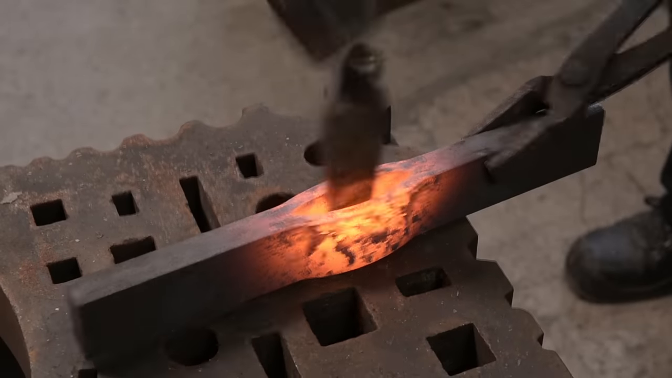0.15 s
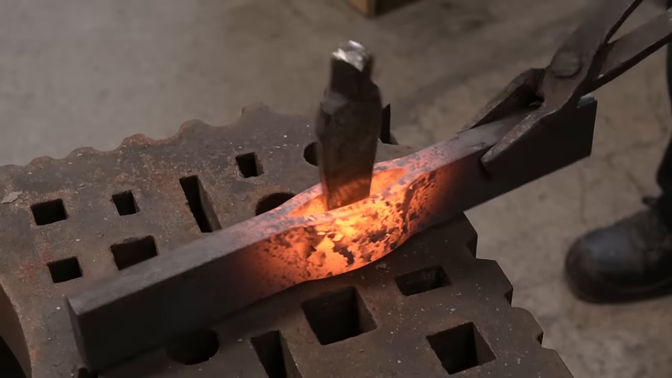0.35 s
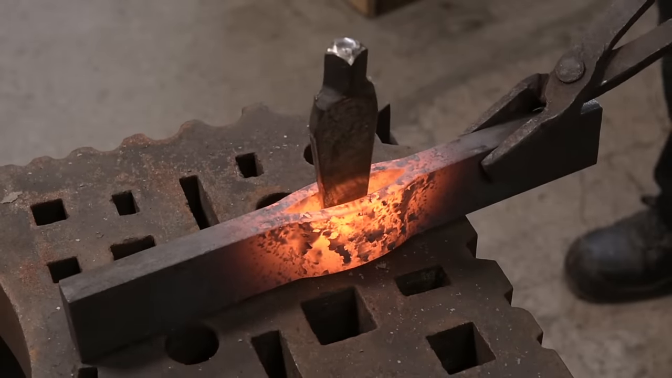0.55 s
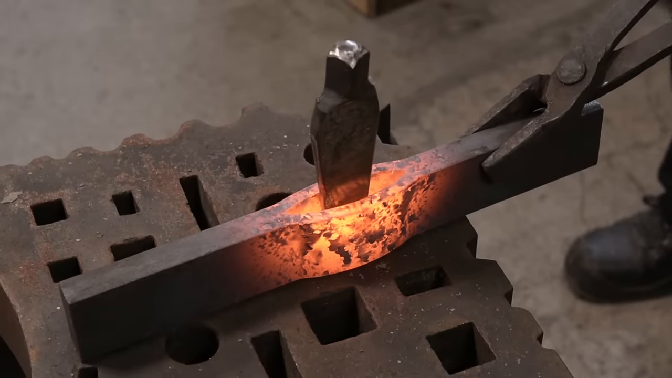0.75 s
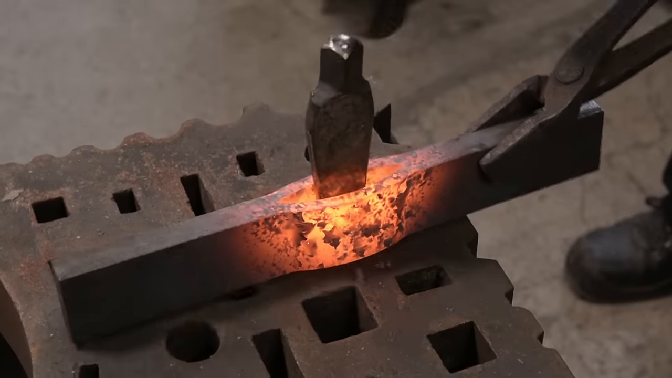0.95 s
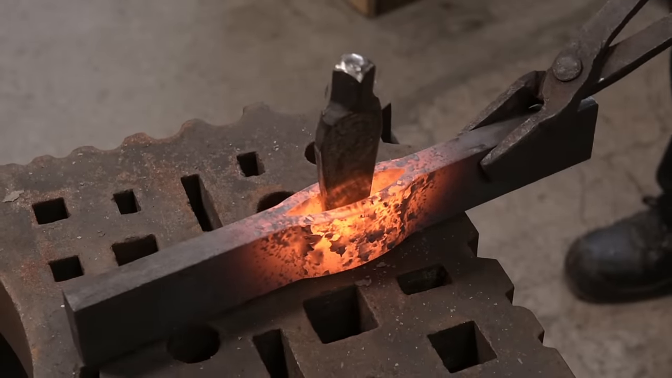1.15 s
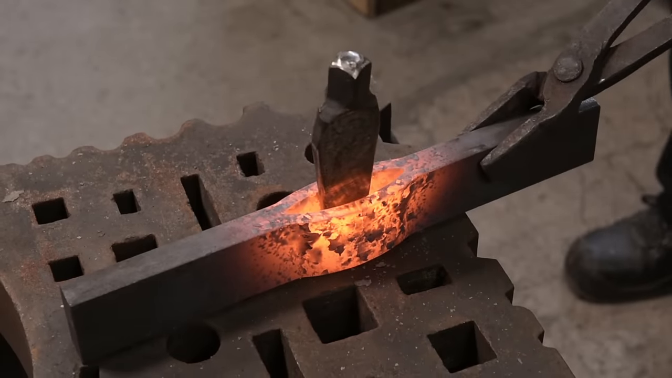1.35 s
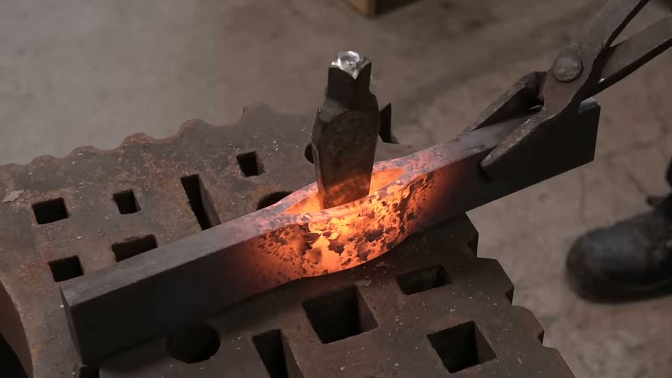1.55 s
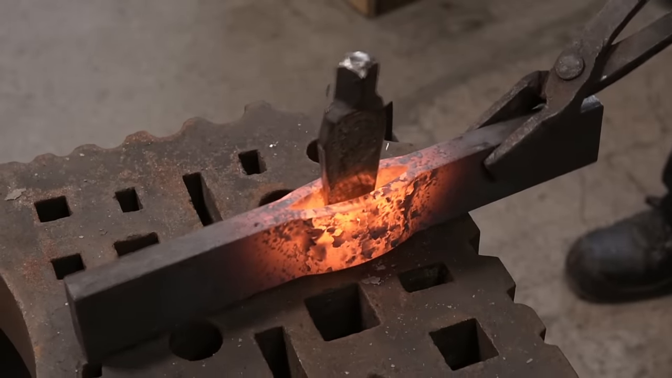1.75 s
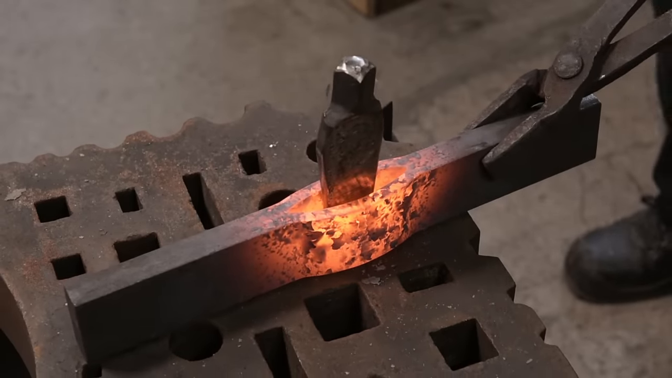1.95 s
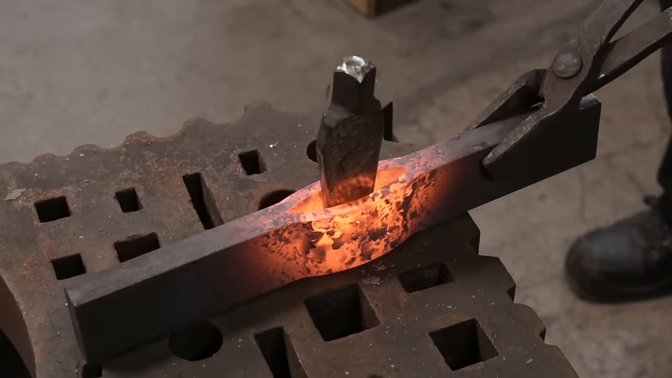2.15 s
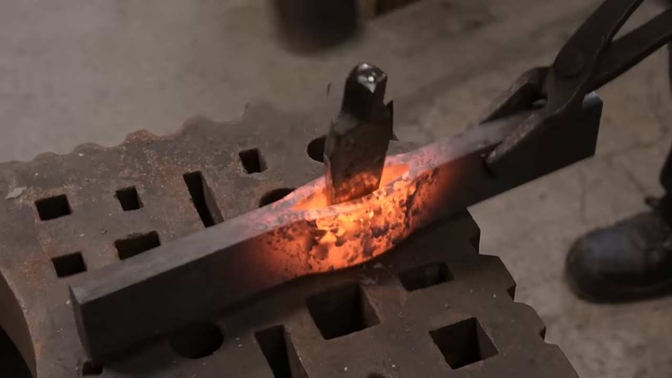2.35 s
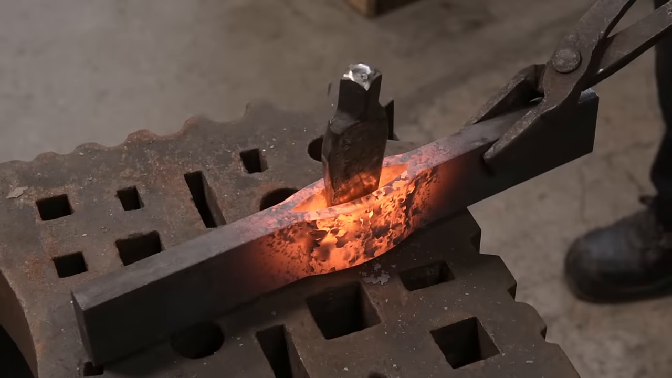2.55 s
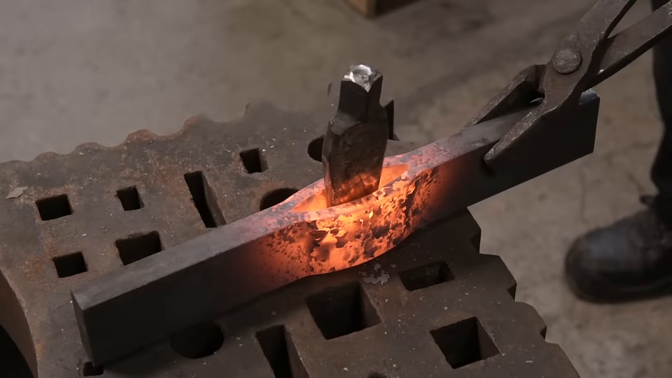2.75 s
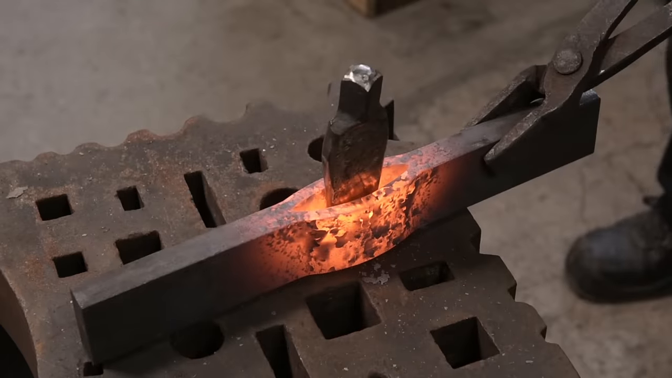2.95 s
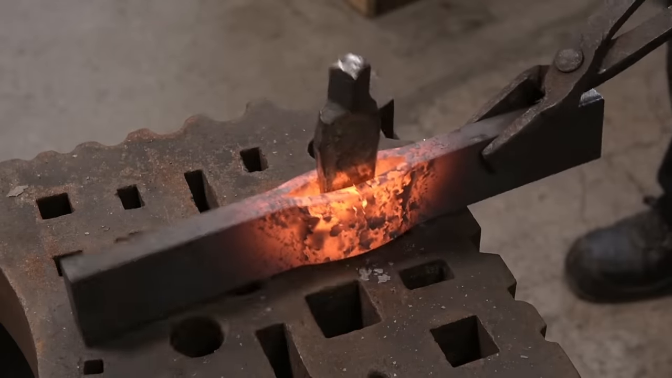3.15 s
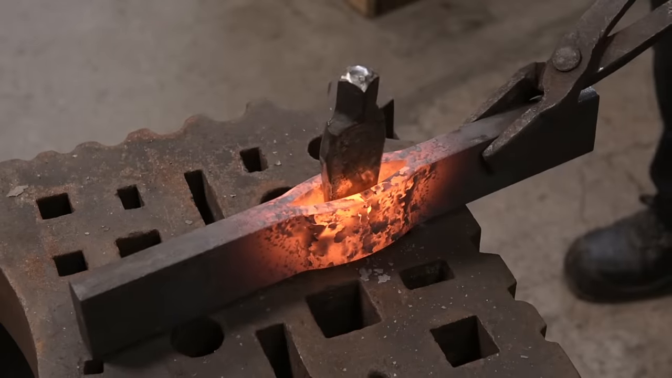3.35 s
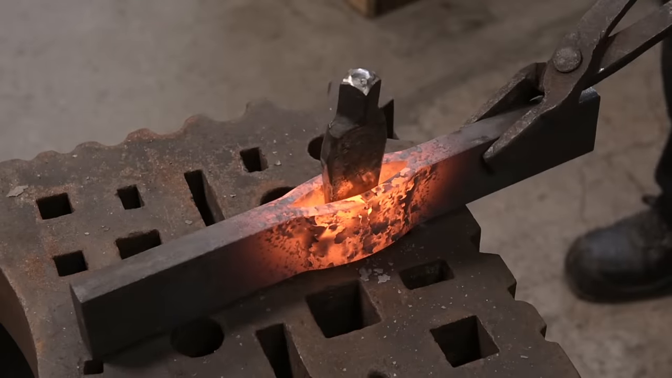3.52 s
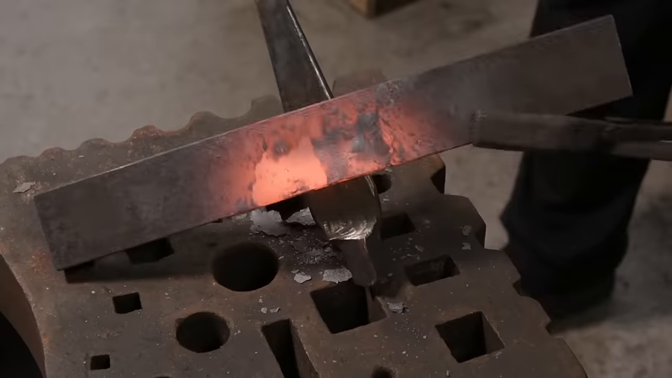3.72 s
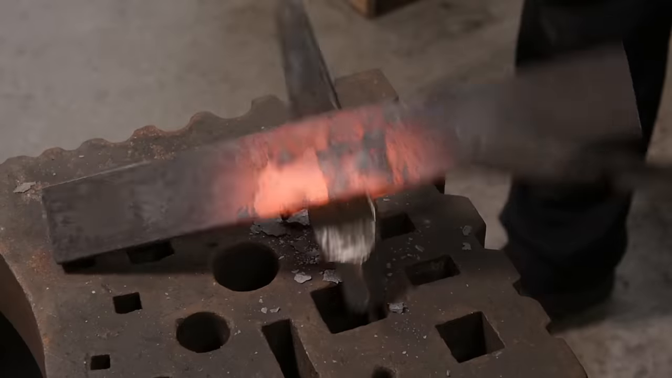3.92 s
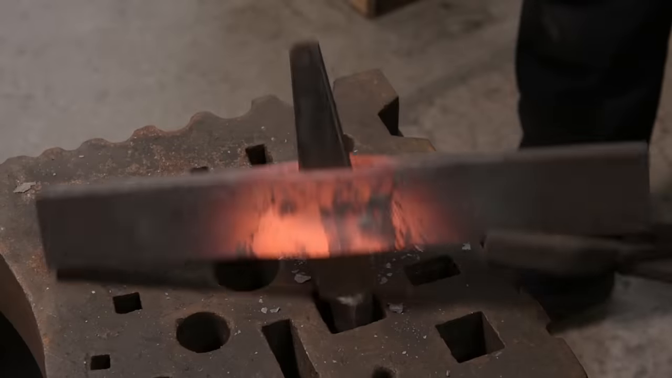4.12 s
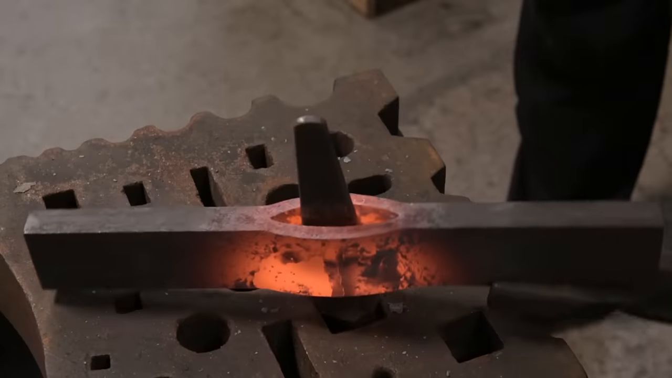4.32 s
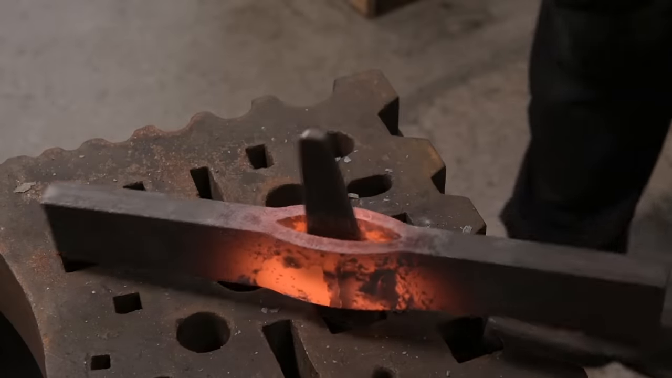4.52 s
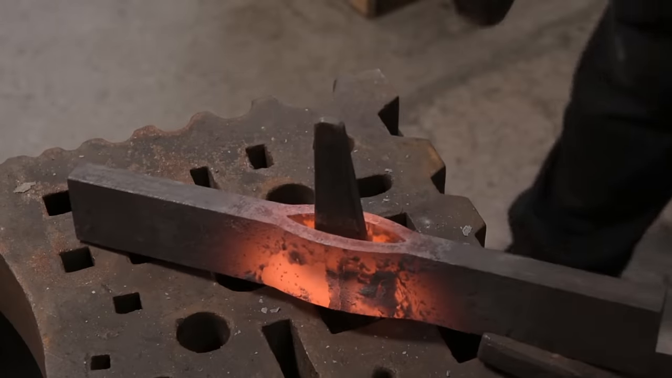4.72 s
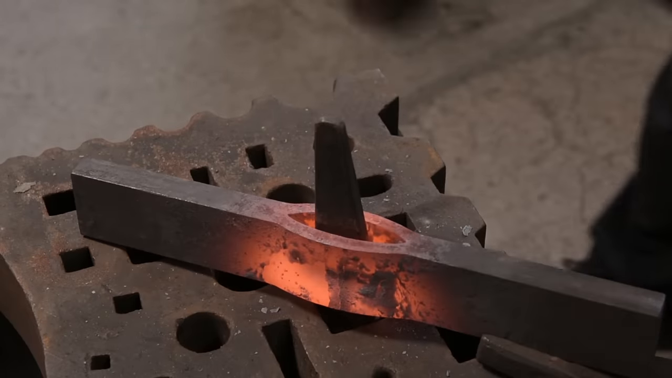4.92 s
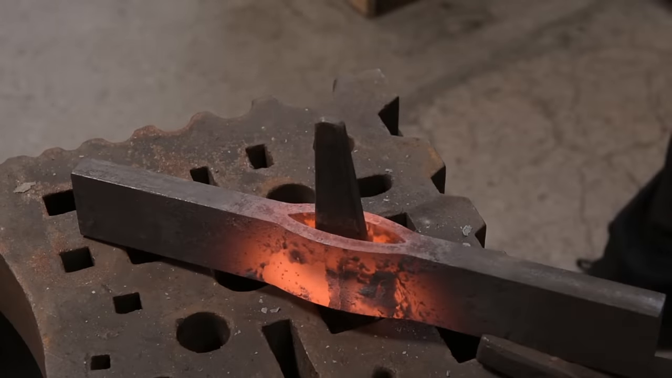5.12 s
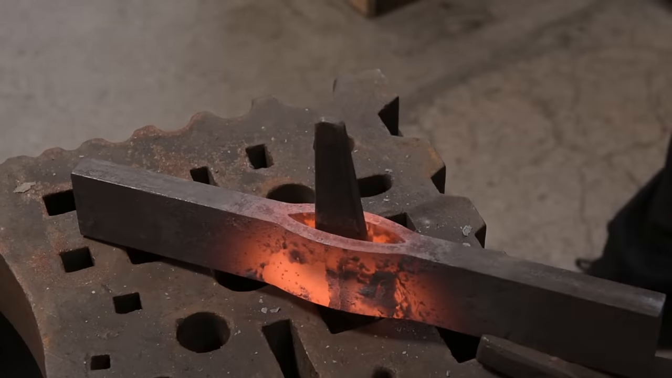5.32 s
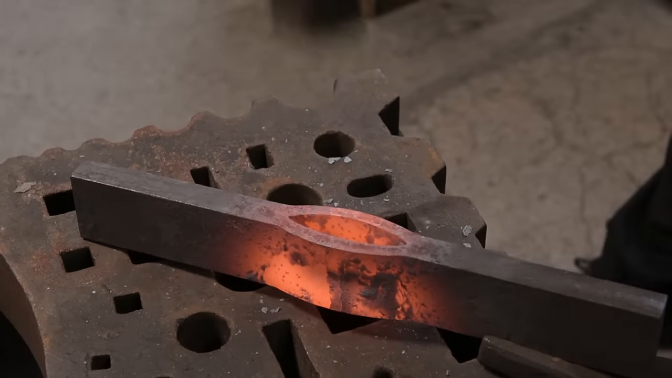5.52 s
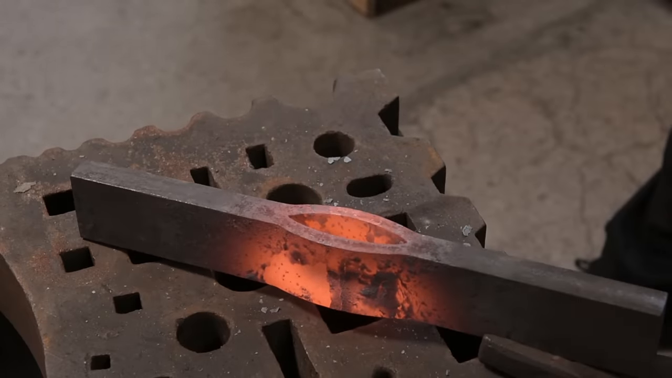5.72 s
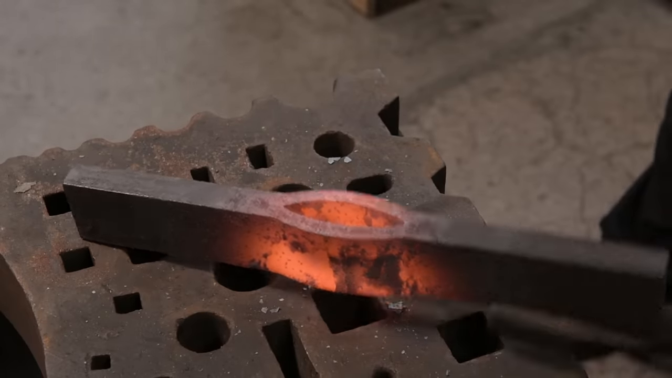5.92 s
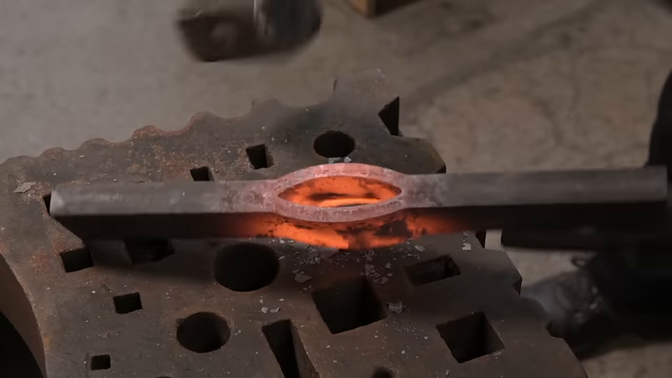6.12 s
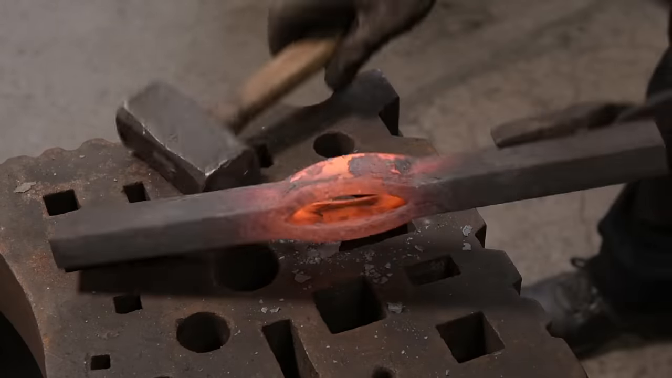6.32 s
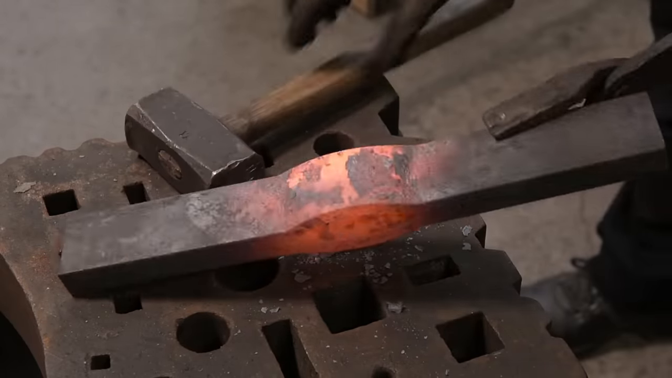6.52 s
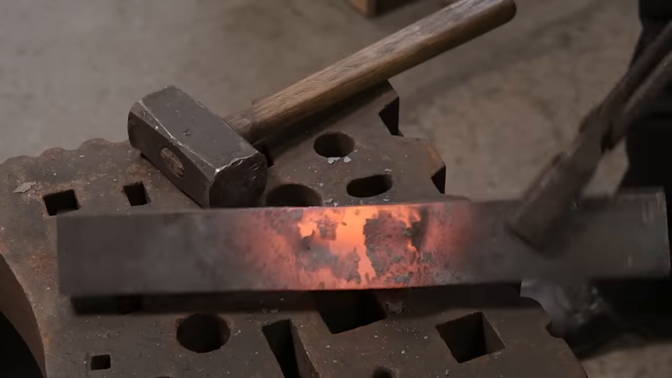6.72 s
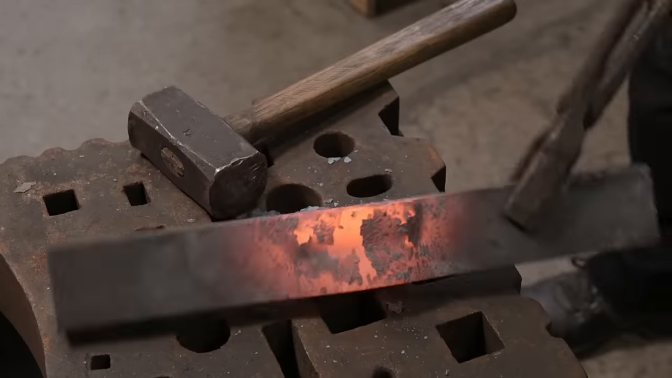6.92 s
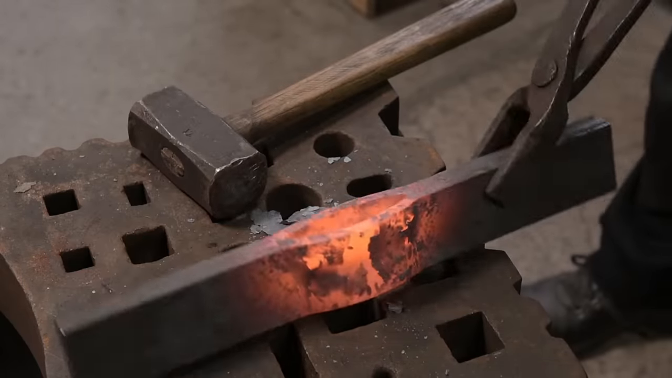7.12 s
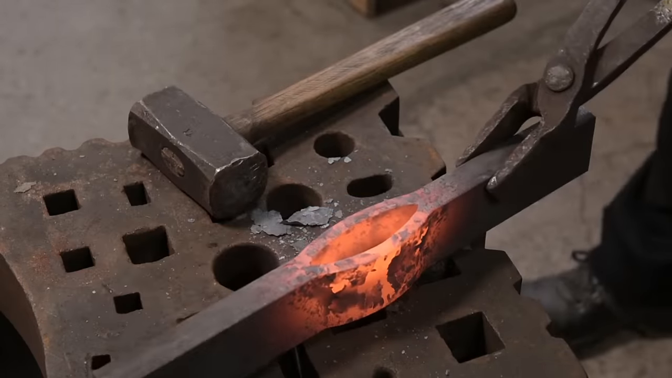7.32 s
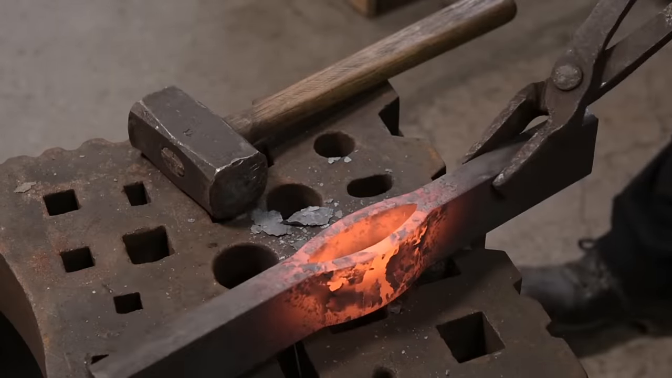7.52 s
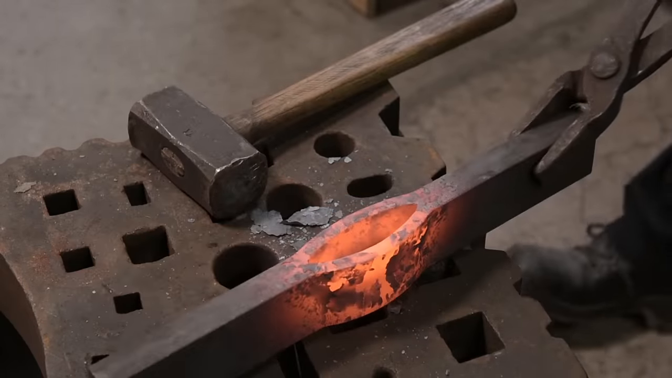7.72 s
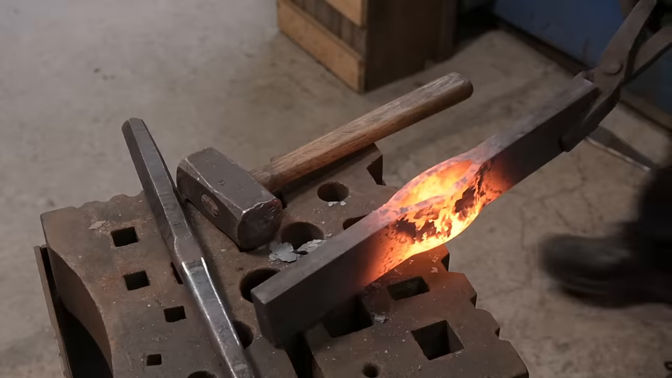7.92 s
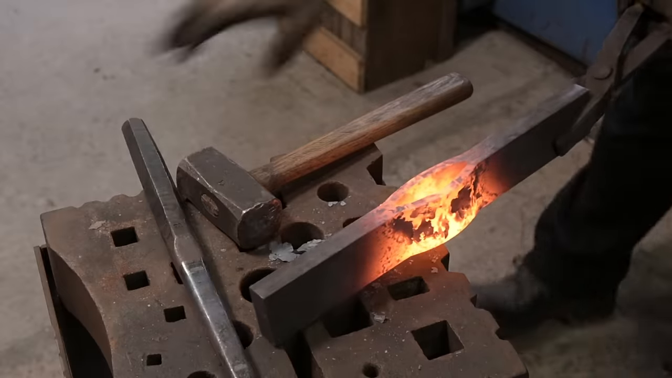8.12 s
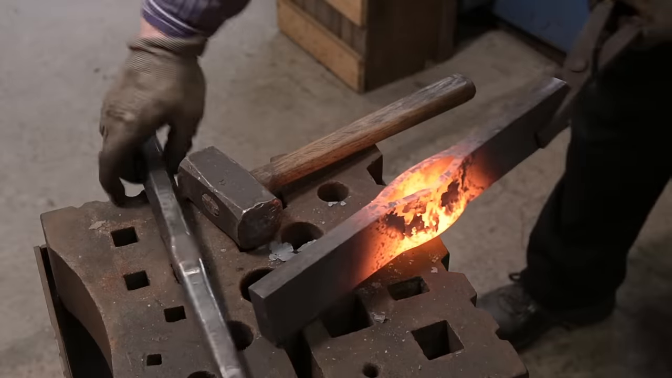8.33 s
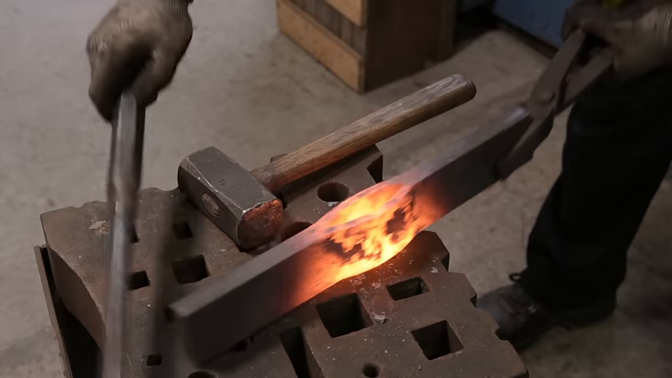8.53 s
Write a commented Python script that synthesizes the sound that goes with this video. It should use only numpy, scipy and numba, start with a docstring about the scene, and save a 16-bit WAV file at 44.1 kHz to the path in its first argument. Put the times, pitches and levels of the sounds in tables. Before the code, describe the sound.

In a workshop, a sledge strikes a steel drift in five loud, slightly distorted blows, about 0.7 seconds apart, each with a sharp crack, short iron ring, low thud and clatter. The bar turns with small knocks and scrapes. One lighter blow knocks the drift out; it clangs and bounces near the microphone with a piercing, wavering ring. The sledge clunks down and a longer steel bar rings briefly.

```python
"""Driving a drift through a hot bar

In a workshop a sledge drives a steel drift through a hot bar lying on an iron swage block: noise cracks,
ringing modes and the stand's thud. The bar is turned over; the drift is knocked out, rings in fluttering
lines, strikes the stand and bounces on the floor near the microphone. Tools knock and scrape on the block,
over a quiet room tone. The recorder overloads on the blows; its limiter then pulls the level down and
holds the tails up."""
import sys
import numpy as np
from scipy import signal
from scipy.fft import rfft, irfft
from scipy.io import wavfile
from scipy.ndimage import uniform_filter1d
from numba import njit

SR = 44100
rng = np.random.default_rng(int(sys.argv[2]) if len(sys.argv) > 2 else 0)


def amp(db):
    return 10 ** (np.asarray(db, float) / 20)


def write(x):
    x = np.atleast_2d(x).T
    wavfile.write(sys.argv[1], SR, np.round(np.clip(x, -1, 1) * 32767).astype(np.int16))


N = 382347   # samples

# ringing modes of the swage block: pitch_hz, level_db, t60_s
BLOCK_MODES = [(1104, -17, .18), (1314, -12, .2), (1486, -11, .18), (1583, -9, .2), (1640, -8, .18),
               (1690, -4, .2), (1750, -5, .2), (1795, -3, .26), (1830, -5, .22), (1868, -3, .22),
               (1920, -4, .2), (1981, -3, .24), (2024, -5, .2), (2075, -7, .18), (2213, -11, .18),
               (2546, -16, .2), (2606, -16, .2), (2810, -13, .2), (3480, -17, .16), (3714, -15, .18),
               (3946, -12, .2), (4040, -13, .18), (4221, -15, .16)]
# low modes of the stand under it: pitch_hz, level_db, t60_s
STAND_MODES = [(55, -4.5, 0.57), (59.6, 2.8, 0.9), (65, -9, 1)]


def rms_one(x):
    """Scales a sound to rms 1."""
    return x / np.sqrt(np.mean(x ** 2) + 1e-20)


def at_hz(points, hz):
    """Reads a table of (Hz, value) on a log-frequency axis."""
    table_hz, values = np.array(points).T
    return np.interp(np.log(hz), np.log(table_hz), values)


def coloured(spectrum):
    """Steady noise of rms 1; the table gives only the shape of its spectrum."""
    hz = np.maximum(np.fft.rfftfreq(N, 1 / SR), 1)
    shaped = rfft(rng.standard_normal(N)) * amp(at_hz(spectrum, hz))
    return rms_one(irfft(shaped, N))


def clicks(times, db):
    """One-sample pulses at the given times."""
    out = np.full(N, 1e-18)   # tiny floor in place of silence
    out[np.round(np.asarray(times) * SR).astype(int)] += amp(np.asarray(db))
    return out


def dying(pulses, t60):
    """Each click becomes a step that fades by 60 dB in t60 seconds."""
    return signal.lfilter([1], [1, -amp(-60 / (t60 * SR))], pulses)


def band(x, low_hz, high_hz):
    """Butterworth band-pass."""
    edges = [low_hz, min(high_hz, .45 * SR)]
    return signal.sosfilt(signal.butter(2, edges, "band", fs=SR, output="sos"), x)


def struck(modes, times, db, spread_db, contact_t60=0):
    """Every hit shakes every mode by its own chance strength, with a clean click or a short rough contact."""
    out = np.zeros(N)
    chance = rng.standard_normal((len(times), len(modes)))
    rough = rng.standard_normal(N)
    for (hz, mode_db, t60), luck in zip(modes, chance.T):
        push = clicks(times, db + mode_db + spread_db * luck)
        if contact_t60:
            # scaled to the energy of the clean click
            push = rough * dying(push, contact_t60) * np.sqrt(2 * np.log(1000) / (contact_t60 * SR))
        r, w = amp(-60 / (t60 * SR)), 2 * np.pi * hz / SR
        out += signal.lfilter([0, np.sin(w)], [1, -2 * r * np.cos(w), r * r], push)
    return out


def sledge_blows():
    """A blow cracks, rings the block through a rough contact, thuds the stand and sets off a clatter."""
    # blows: start_s, crack_db, block_ring_db, stand_thud_db,
    # bright_db (added to the crack's treble; per octave in the clatter)
    blows = [(0.2309, 13, -9.5, -19, 4.5), (.987, 13, -8.5, -20.5, 3.5), (1.703, 14, -6.5, -19, 2.2),
             (2.395, 11, -12, -25, 1.27), (3.087, 15.5, -8, -22, 0.95), (5.4535, 5.5, -18.5, -25.5, 3)]
    # spectrum of the crack: pitch_hz, relative level_db per Hz
    crack_spectrum = [(59, -37), (100, -7), (206, -3), (502, -18.5), (1170, -6.5), (1760, 2.5), (2320, -5),
                      (3320, -1), (4700, -16.5), (5700, -15.5), (7450, -32), (11600, -46), (16000, -45)]
    # high modes of the sledge: pitch_hz, level_db, t60_s
    sledge_modes = [(11320, -55, .3), (11350, -53, .3)]
    # the block rocking on its stand: pitch_hz, level_db, t60_s
    rocking_modes = [(164, -2.5, 0.47), (204.2, -0.4, 0.61), (216, -5.5, 0.21), (255, -0.5, 0.13)]
    s, crack_db, ring_db, thud_db, bright_db = np.transpose(blows)
    crack = coloured(crack_spectrum)
    treble = band(crack, 4200, 8400)   # about an octave above the middle of the crack
    iron = (crack - treble) * dying(clicks(s, crack_db), 0.042)
    iron += treble * dying(clicks(s, crack_db + bright_db), 0.037)
    iron += struck(BLOCK_MODES, s, ring_db, 0.59, contact_t60=0.035)
    iron += struck(sledge_modes, s, crack_db, 4)
    stand = struck(STAND_MODES, s, thud_db, 0.66)
    stand += struck(rocking_modes, s, ring_db - 10, 0.7)   # it rocks as hard as it rings
    clatter_db = -14 + 0.1 * crack_db   # the clatter follows a tenth of the crack's dB
    return iron, stand + clatter(s, clatter_db, bright_db)


def clatter(times, db, bright_db):
    """The countless close modes of bar, block and loose tools: a dense wash that dies band by band."""
    # loudness of the wash: pitch_hz, level_db per half-octave band
    band_levels = [(300, -17), (700, -10), (1200, -3.5), (1800, 1), (2500, 4), (3500, -1), (5000, 0.5),
                   (6500, -1.5), (8500, -9), (11000, -12), (15000, -29)]
    # its decay: pitch_hz, t60_s
    band_decays = [(300, 1), (1800, 0.55), (3500, 0.31), (6000, 0.26), (9000, 0.055), (14000, .3)]
    rattles_per_s, rattle_db, rattle_t60_s = 600, -5.5, 0.0042   # loose iron chatters inside it
    rattle = (rng.random(N) < rattles_per_s / SR) * rng.exponential(1, N)
    chatter = 1 + amp(rattle_db) * dying(rattle + 1e-18, rattle_t60_s)
    white = rng.standard_normal((2, N)) * chatter   # neighbouring bands take different noise
    edges = 220 * 2 ** np.arange(0, 6.3, .5)
    out = np.zeros(N)
    for k, (low, high) in enumerate(zip(edges, edges[1:])):
        hz = np.sqrt(low * high)
        hits = clicks(times, db + at_hz(band_levels, hz) + bright_db * np.log2(hz / 2500))
        out += rms_one(band(white[k % 2], low, high)) * dying(hits, at_hz(band_decays, hz))
    return out


def free_bar(modes, hits, crack_t60, flutter_db, flutter_hz, lying_share, share_per_s):
    """A free bar's lines flutter as it turns, ring longer the higher it jumps; each touch chokes the old ring."""
    # a bar landing: pitch_hz, relative level_db per Hz
    landing_spectrum = [(59, -40), (100, -12.5), (2130, -10.5), (2470, -20), (3320, -2.5), (3860, -23),
                        (10700, -57.5), (14100, -42), (16000, -52)]
    s, crack_db, *_ = np.transpose(hits)
    out = coloured(landing_spectrum) * dying(clicks(s, crack_db), crack_t60)
    chance = rng.uniform(0, 2 * np.pi, (len(hits), len(modes), 3))
    # share of the free t60 left: grows with the time to the next touch
    shares = lying_share + share_per_s * np.diff(s, append=s[-1])
    ends = [*s[1:], s[-1] + 1]
    for begin, end, share, hit, turns in zip(s, ends, shares, hits, chance):
        _, _, ring_db, tilt_db, edge_db = hit
        start = round(begin * SR)
        t = np.arange(min(N, round((end + .02) * SR)) - start) / SR
        choke = amp(-3000 * np.maximum(t - end + begin, 0))   # 3000 dB per s from the next touch on
        held = np.clip(t / .0015, 0, 1) * choke
        for (hz, db, t60, edgewise), (phase, turn, speed) in zip(modes, turns):
            struck_db = ring_db + db + edge_db * edgewise + tilt_db * np.log2(hz / 4000)
            # each line at 0.48 to 1.48 times flutter_hz
            facing_db = flutter_db * np.sin(turn + (3 + speed) * flutter_hz * t)
            fade_db = -60 * t / (t60 * max(share, .05))
            level = held * amp(struck_db + facing_db + fade_db)
            out[start:start + len(t)] += level * np.sin(2 * np.pi * hz * t + phase)
    return out


def falling_drift():
    """The drift rings in bending modes at each touch, and lengthwise from the end-on blow."""
    # touches on steel or floor: start_s, crack_db, ring_db, brightness_db per octave, edgewise_modes_db
    bounces = [(5.4525, -20, -21, 11, -21), (5.700, 7, -19, -1, 5.5), (6.057, 0.5, -20, -3, -5),
               (6.286, -8.5, -28, -6, 12), (6.309, -5.5, -18.5, -3.5, 10), (6.407, -37, -12.5, 0, 0.5),
               (6.592, -27.5, -47, 3, 9)]
    # lengthwise ring from the end-on blow, mostly choked by later touches: start_s, level_db
    end_on = [(5.4545, -6.5), (5.699, -33.5), (6.057, -52), (6.407, -42)]
    # bending: pitch_hz, level_db, t60_s before the jump's share, edgewise (1 if the bar bends edgewise)
    bending_modes = [(1276, -6, 2.5, 0), (4404, -9, 1.2, 1), (5346, -7, 1.2, 1), (6200, -8, 1.5, 0),
                     (6238, -8, 1.2, 0), (9625, -12, 1.1, 1), (9927, -12, .6, 0), (9966, -12, .8, 0)]
    # lengthwise modes, same columns
    lengthwise_modes = [(13950, -.1, .8, 0), (13985, -4, .8, 0), (14400, -7, .6, 0), (15010, -20, .6, 0)]
    drift = free_bar(bending_modes, bounces, 0.036, flutter_db=6.0, flutter_hz=5.2,
                     lying_share=0.21, share_per_s=1.6)
    end_on_hits = [(s, -np.inf, db, 0, 0) for s, db in end_on]   # no crack of their own
    drift += free_bar(lengthwise_modes, end_on_hits, .01, flutter_db=4.5, flutter_hz=20.0,
                      lying_share=0.3, share_per_s=0.83)
    return drift


def tumbling_mode():
    """The drift's strongest mode swings toward the listener and away while it fades, beside two neighbours."""
    # stages, each begun by a touch or a half turn: start_s,
    # facing_db (before the fade), away_db (lost when turned away)
    stages = [(5.455, -9, 6.5), (5.702, 5, 9), (5.848, -2.5, 16), (6.056, 8, 16.5), (6.21, 0, -1.6),
              (6.417, -18, 4.5), (6.6, -59, .3)]
    # close neighbours rung by the blow: pitch_hz, level_db, t60_s
    neighbours = [(3350, -15, 0.89), (3200, -21.5, 0.42)]
    pitch_hz, octave_db = 3310, -32.5   # with a faint line at twice the pitch
    turn_s, fade_db_per_s, blend_s = 0.22, 31.5, 0.004
    edge_on_s, edge_on_width_s = 6.21, 0.012   # the mode vanishes as the drift passes edge-on
    s, facing_db, away_db = np.transpose(stages)
    t = np.arange(N) / SR
    stage = np.maximum(np.searchsorted(s, t) - 1, 0)
    since = t - s[stage]
    turned_away = np.cos(np.pi * since / turn_s) ** 2
    db = facing_db[stage] - away_db[stage] * turned_away - fade_db_per_s * since
    height = uniform_filter1d(amp(db), size=round(blend_s * SR)) * (t > s[0])
    height *= np.tanh((t - edge_on_s) / edge_on_width_s)
    phase = 2 * np.pi * pitch_hz * t
    line = height * (np.sin(phase) + amp(octave_db) * np.sin(2 * phase))
    return line + struck(neighbours, [s[0]], 0, 0)


def long_drift():
    """A longer drift, picked up and knocked, rings as a free bar; the block answers with a clatter."""
    # knocks: start_s, crack_db, ring_db, brightness_db per octave, edgewise_modes_db
    long_knocks = [(8.4035, -20, -13.5, -2.2, -6), (8.484, -30, -31.5, -4.5, 11.5),
                   (8.55, -22, -33.5, -6, 8.5)]
    # bar modes: pitch_hz, level_db, t60_s before the jump's share, edgewise (1 if the bar bends edgewise)
    long_modes = [(1174, -18, .4, 1), (1540, -14, .4, 1), (2105, -7, .4, 1), (2772, -11, .35, 1),
                  (3289, -.1, .3, 0), (3430, -8, .35, 1), (4414, -11, .35, 0), (4549, -11, .25, 0),
                  (4845, -8, .25, 0), (6519, -4, .3, 0), (8441, -9, .3, 0), (9921, -19, .4, 0),
                  (10670, -18, .3, 0), (12860, -25, .4, 0), (13440, -31, .5, 0), (15340, -17, .35, 0)]
    ring = free_bar(long_modes, long_knocks, 0.01, flutter_db=8.0, flutter_hz=22.2,
                    lying_share=0.17, share_per_s=3.6)
    s, _, ring_db, *_ = np.transpose(long_knocks)
    return ring, clatter(s, ring_db - 20.5, 2.5)   # 2.5 dB brighter per octave


def knocks_and_ticks():
    """Knocks have a clank, a bright edge, a low knock, a block ring and a push on the stand; ticks are bright."""
    # bar, tongs and hammer knock on the block, and at 5.847 s the falling drift strikes the stand:
    # start_s, clank_db, low_knock_db, block_ring_db
    knocks = [(0.419, -4.5, -10, -21), (0.454, -10, -22, -17), (0.601, -30, -24.5, -65),
              (3.716, -33, -16.5, -45), (3.947, -34.5, -27, -52.5), (4.047, -21, -9, -34),
              (4.122, -26, -20, -63), (4.168, -24, -17.5, -35), (4.26, -25, -13, -61),
              (4.695, -20, -15.5, -38), (4.721, -46.5, -18, -37.5), (5.847, 6, -10.5, -18.5),
              (6.37, -13.5, -17.5, -34), (6.418, 11, -10.5, -17), (6.481, 5, -12.5, -27.5),
              (6.511, 1.5, -14.5, -38), (6.594, 3, -14.5, -51), (6.698, -19, -23, -31),
              (6.761, -30, -25, -58), (6.822, -20.5, -6.5, -30.5), (6.989, -10.5, -30, -38.5),
              (7.361, -50, -22, -60), (7.764, -25.5, -29.5, -60.5), (7.895, -15, -20, -28),
              (8.272, -40, -44, -67), (8.547, -11.5, -24, -36), (8.624, -37, -28, -51)]
    # small bright ticks; those at 4.696 and 6.37 s are the bright edge of a knock: start_s, level_db
    ticks = [(2.217, -50), (4.696, -43), (4.808, -42.5), (6.37, -25.5), (7.208, -49), (7.533, -52),
             (8.343, -46), (8.353, -52), (8.362, -56)]
    s, clank_db, low_db, ring_db = np.transpose(knocks)
    white = rng.standard_normal((3, N))
    sparks = clicks(s, clank_db - 37) + clicks(*np.transpose(ticks))
    iron = band(band(white[0] * dying(clicks(s, clank_db), 0.029), 1200, 3600), 500, 4000)
    iron += band(white[1] * dying(sparks, .008), 3500, 11000)
    iron += band(white[2] * dying(clicks(s, low_db), 0.08), 84, 800)
    ring = struck(BLOCK_MODES, s, ring_db, 1.2, contact_t60=0.035)
    iron += band(ring, 400, 2620)   # gentler touches hardly reach the block's upper modes
    return iron, struck(STAND_MODES, s, low_db - 26.5, 0.66)


def loose_tools():
    """Tongs, the stand's leg and the laid-down sledge ring through short rough contacts."""
    # the tongs slipping on the bar: start_s, reins_db, jaws_db
    clinks = [(4.166, -58, -47), (4.21, -68, -52), (4.258, -64, -53), (4.63, -66, -60), (7.766, -52, -75)]
    # modes of the reins: pitch_hz, level_db, t60_s
    reins_modes = [(4300, -9, 0.06), (7140, -2, 0.069), (9200, -9, 0.079), (11000, -27, 0.032)]
    # modes of the jaws: pitch_hz, level_db, t60_s
    jaw_modes = [(5450, -.3, 0.12), (5330, -1.5, 0.11)]
    # the falling drift clangs against a steel leg of the stand: start_s, level_db
    leg_hits = [(5.847, 1.5), (5.873, -2.5), (5.905, -3), (5.94, -7)]
    # modes of the leg: pitch_hz, level_db, t60_s
    leg_modes = [(1686, -12, .06), (1868, -12, .06), (2170, -8, .05), (2465, -14, .05), (3020, -11, .05),
                 (3604, -5, .07), (3715, -9, .06), (3900, -8, .06), (4290, -9, .06), (4721, -10, .05),
                 (4877, -13, .05), (5410, -14, .05), (5950, -16, .05)]
    # the sledge laid down rocks on the block: start_s, level_db
    laid_down = [(6.419, -8.5), (6.452, -14.5), (6.483, -21), (6.511, -20), (6.592, -19), (6.698, -27.5),
                 (6.763, -38.5)]
    # modes of sledge on iron: pitch_hz, level_db, t60_s
    laid_modes = [(1588, -7, .18), (1760, -8, .2), (1984, -.5, .18), (2024, -4, .2), (2160, -4, .12),
                  (2628, -8, .22), (2700, -9, .2), (2820, -9, .22), (2877, -9, .22), (3050, -12, .16),
                  (3282, -11, .2), (3760, -10, .18), (3950, -10, .18)]
    s, reins_db, jaws_db = np.transpose(clinks)
    out = struck(reins_modes, s, reins_db, 2.6, contact_t60=0.056)
    out += struck(jaw_modes, s, jaws_db, 0.86, contact_t60=0.033)
    out += struck(leg_modes, *np.transpose(leg_hits), 2.1, contact_t60=0.059)
    return out + struck(laid_modes, *np.transpose(laid_down), 1.8, contact_t60=0.0078)


def scrapes():
    """Steel dragged over iron: dense grit that swells and sinks with the stroke, a hiss on top."""
    # strokes: middle_s, length_s, level_db, hiss_db (against the grit)
    strokes = [(4.216, 0.15, -51, -24), (4.427, 0.069, -55.5, -12), (4.621, 0.122, -52.5, -18),
               (4.992, 0.31, -44.5, -19), (6.972, 0.23, -37.5, -12), (8.39, .1, -47.5, -12)]
    # spectrum of the grit: pitch_hz, relative level_db per Hz
    grit_spectrum = [(240, -32.5), (400, 11), (556, 0.5), (855, -2), (1170, 7.5), (1930, 6), (3330, 7),
                     (6000, -11), (7800, -11), (13200, -120)]
    t = np.arange(N) / SR
    grit = coloured(grit_spectrum)
    spiky = rng.standard_normal(N) * amp(3.0 * rng.exponential(1, N))
    hiss = rms_one(band(spiky, 5500, 13000))
    out = np.zeros(N)
    for middle, length, db, hiss_db in strokes:
        swell_db = -20.5 * (2 * (t - middle) / length) ** 2   # -20.5 dB at both ends of a stroke
        out += amp(db + swell_db) * (grit + amp(hiss_db) * hiss)
    return out


def shop(x):
    """Diffuse workshop reverberation: noise that builds up fast and dies band by band."""
    # decay of the workshop: pitch_hz, t60_s
    shop_decays = [(100, 0.62), (400, 0.44), (1500, 0.37), (3000, 0.37), (5500, 0.34), (8000, 0.17),
                   (12000, 0.099)]
    level_db, build_s = -8, 0.015
    t = np.arange(SR) / SR
    edges = 70 * 2 ** np.arange(0, 8.1, .5)
    white = rng.standard_normal((2, SR))
    tail = np.zeros(SR)
    for k, (low, high) in enumerate(zip(edges, edges[1:])):
        t60 = at_hz(shop_decays, np.sqrt(low * high))
        tail += band(white[k % 2], low, high) * amp(-60 * t / t60)
    tail *= 1 - np.exp(-t / build_s)
    tail /= np.sqrt(np.sum(tail ** 2))
    return amp(level_db) * signal.fftconvolve(x, tail)[:N]


def room_tone():
    """Steady coloured noise, the quiet air of the workshop."""
    # spectrum of the air: pitch_hz, relative level_db per Hz
    air_spectrum = [(15, -25.5), (25, -3), (92, 7), (145, 0.5), (212, 2.5), (293, -4), (503, -4),
                    (1130, -10), (1560, -10.5), (1790, -10.5), (2550, -21), (3340, -15), (5000, -30),
                    (13200, -41), (16000, -61)]
    return amp(-53) * coloured(air_spectrum)


@njit
def limiter(x, top, share, attack, release, hold):
    """The gain chases top / peak level: quickly down, slowly up."""
    out, peak, gain = np.empty_like(x), 0.0, 1.0
    for i in range(len(x)):
        peak = max(abs(x[i]), peak * hold)
        wanted = (top / max(peak, top)) ** share
        gain += (wanted - gain) * (attack if wanted < gain else release)
        out[i] = gain * x[i]
    return out


def scene():
    """The iron sounds directly and through the shop; a quiet room tone lies under it."""
    blow_iron, blow_stand = sledge_blows()
    knock_iron, knock_stand = knocks_and_ticks()
    long_ring, long_clatter = long_drift()
    iron = blow_iron + knock_iron + scrapes() + loose_tools() + long_ring
    direct_only = blow_stand + knock_stand + long_clatter
    drift, tumble = falling_drift(), tumbling_mode()
    # the drift on the floor lies near the microphone and is drier
    to_shop = iron + amp(-6.0) * drift + amp(-14.5) * tumble
    mix = iron + direct_only + drift + tumble + shop(to_shop) + room_tone()
    return mix[None]


def roll_off(x):
    """The treble ends steeply here."""
    return signal.sosfilt(signal.butter(12, 16320, fs=SR, output="sos"), x)


def record(dry):
    """The input stage clips first; the limiter follows, so flat tops shrink during a blow."""
    threshold_db, share = -21, .87   # share of the excess dB taken away
    attack_s, release_s, hold_s = .0062, .04, .008   # time constants
    clipped = np.clip(dry[0], -.97, .97)
    limited = limiter(clipped, amp(threshold_db), share,
                      1 / (SR * attack_s), 1 / (SR * release_s), 1 - 1 / (SR * hold_s))
    return roll_off(limited[None])


dry = scene()
out = record(dry)
write(out)
```